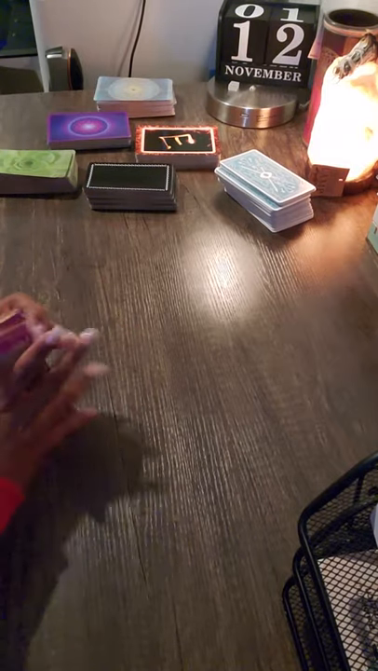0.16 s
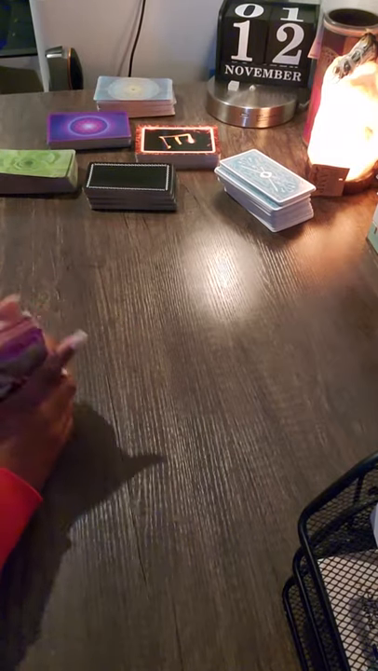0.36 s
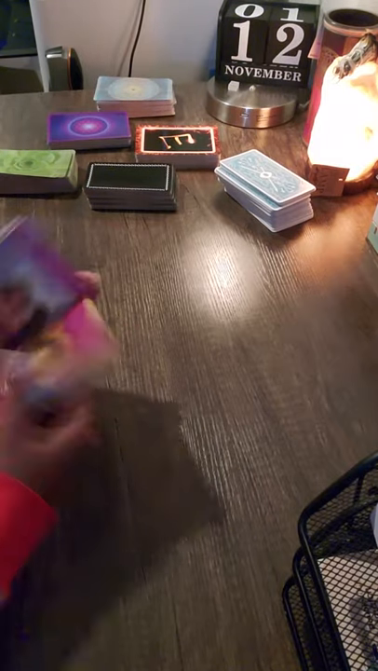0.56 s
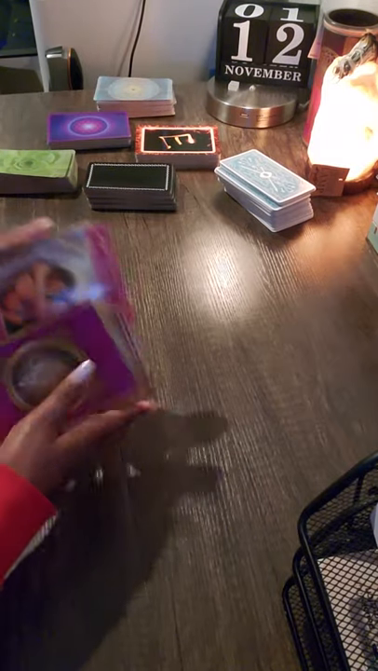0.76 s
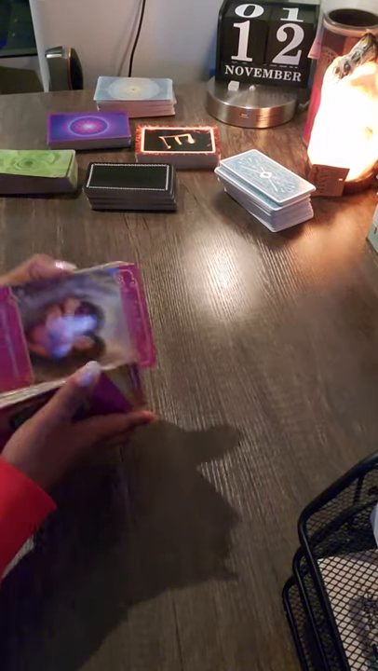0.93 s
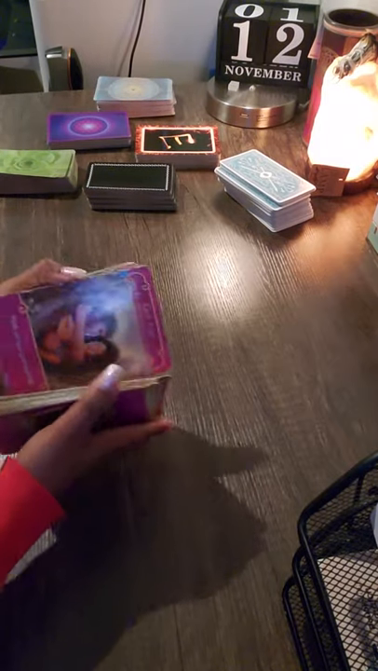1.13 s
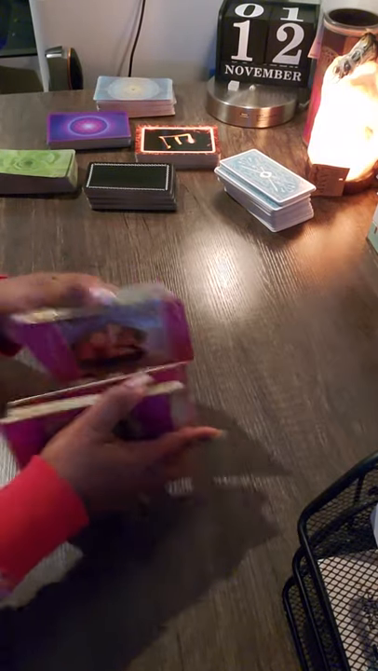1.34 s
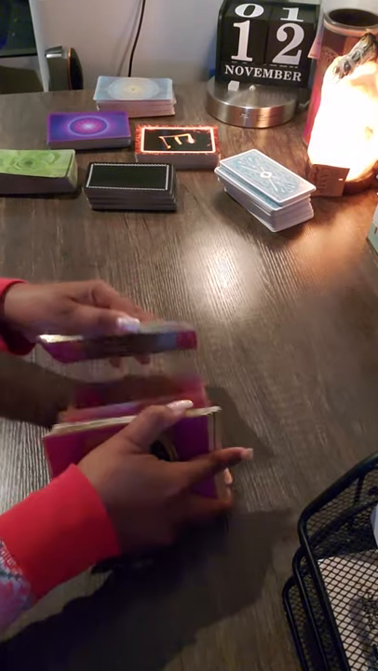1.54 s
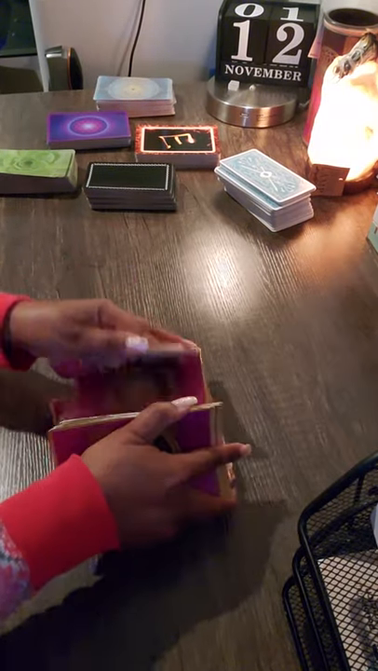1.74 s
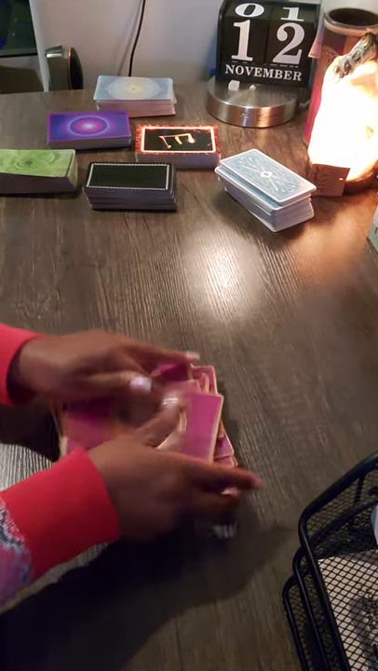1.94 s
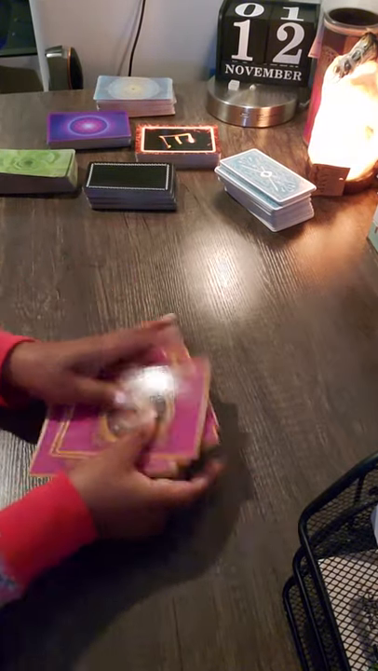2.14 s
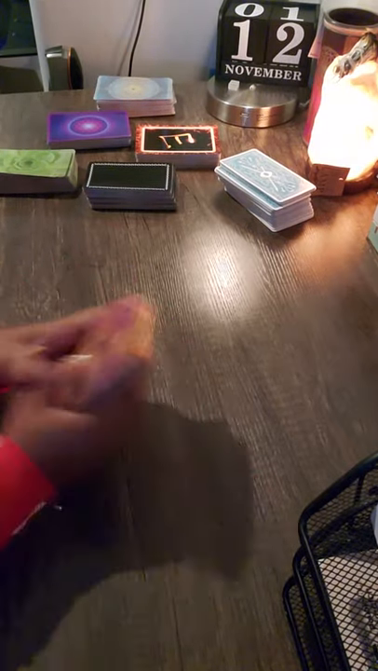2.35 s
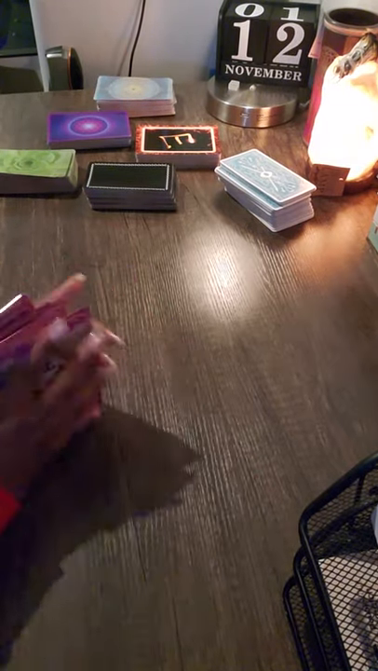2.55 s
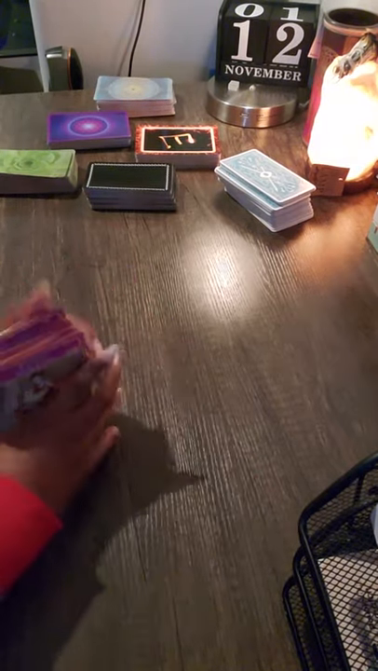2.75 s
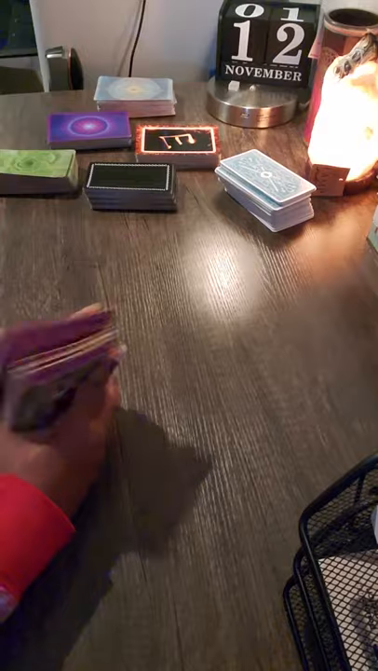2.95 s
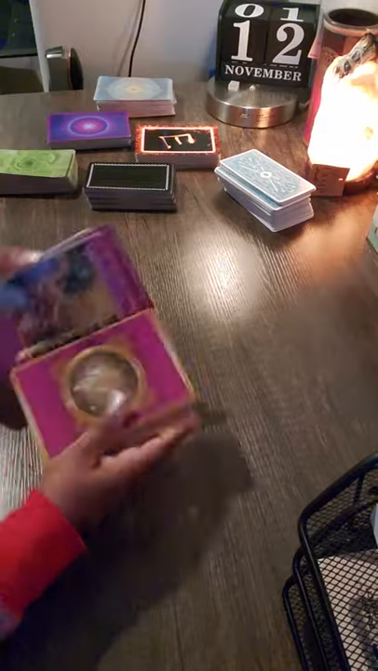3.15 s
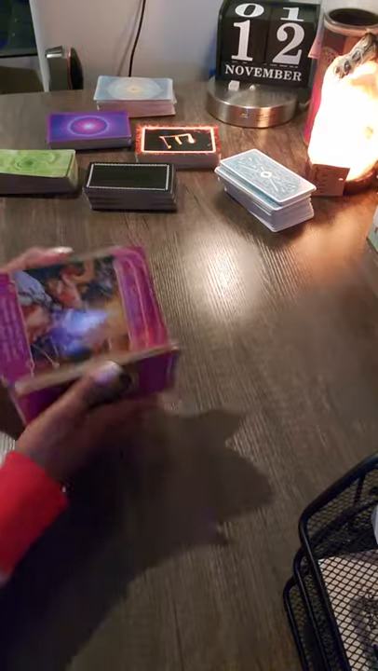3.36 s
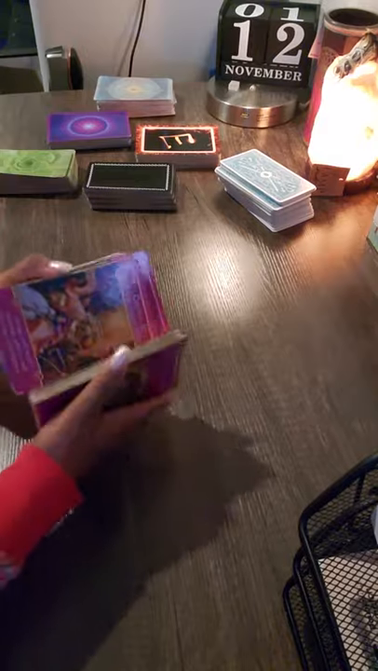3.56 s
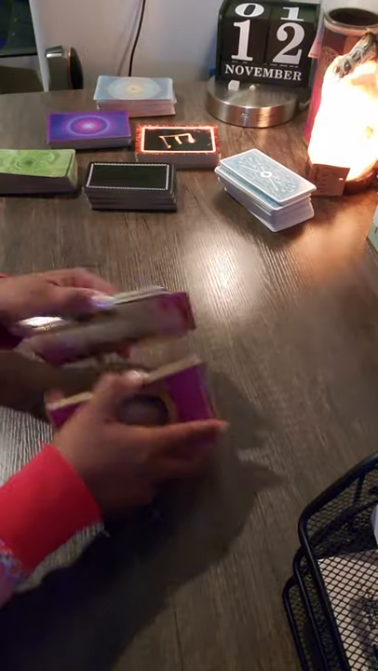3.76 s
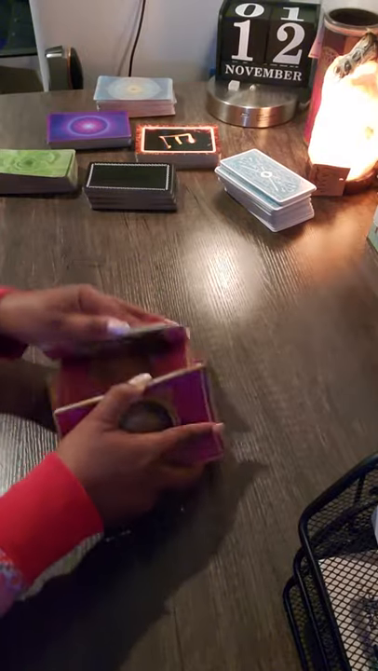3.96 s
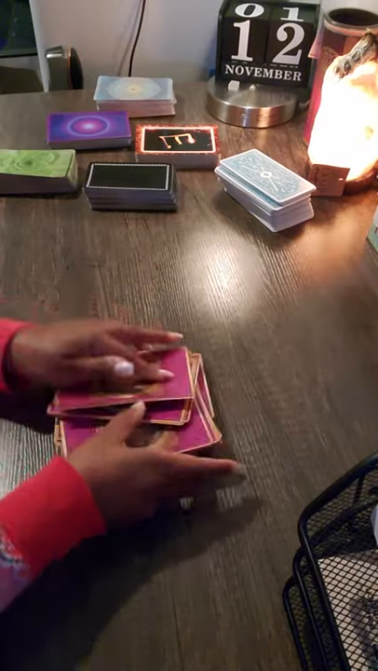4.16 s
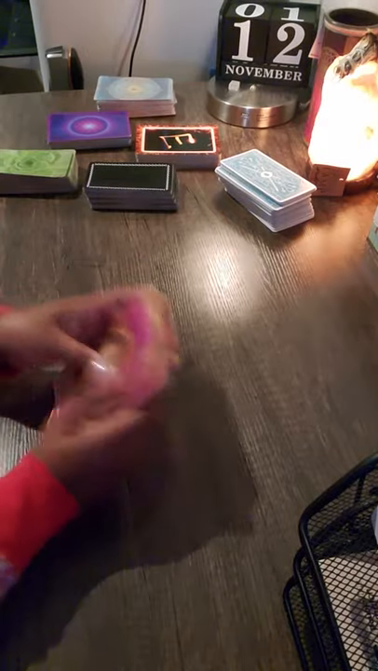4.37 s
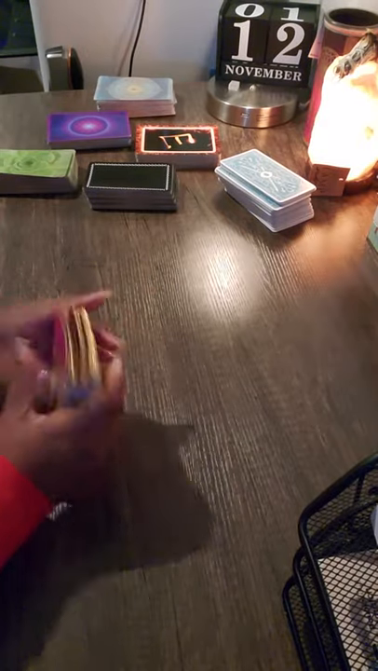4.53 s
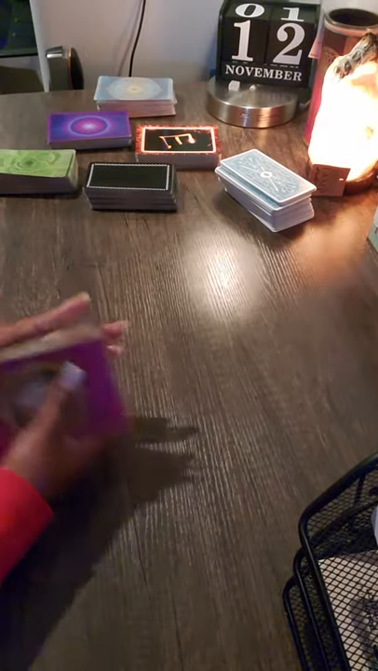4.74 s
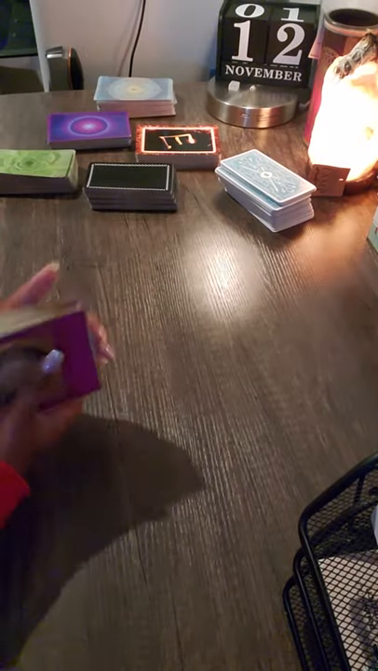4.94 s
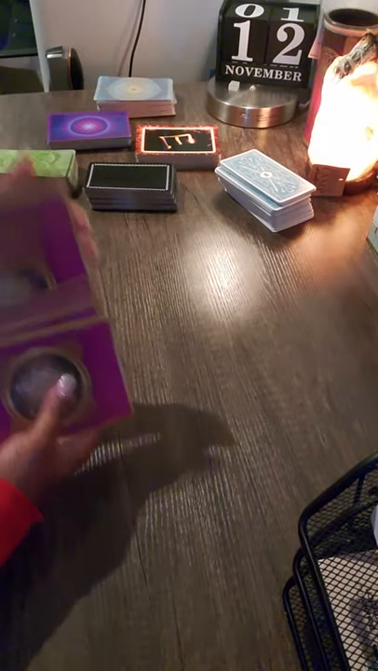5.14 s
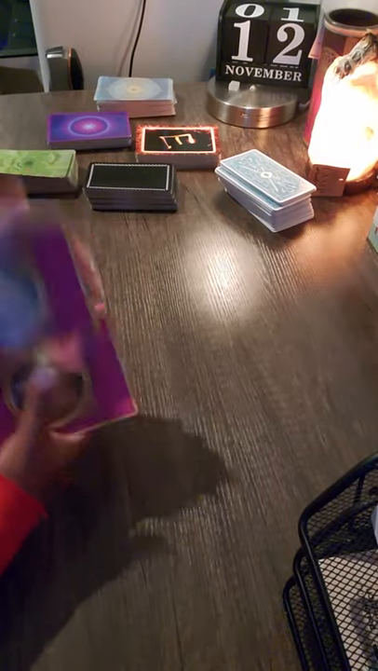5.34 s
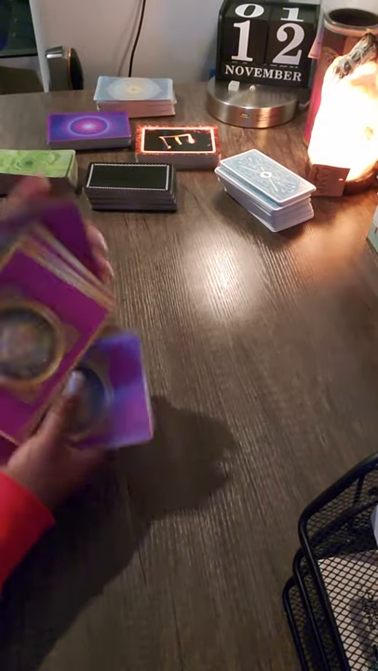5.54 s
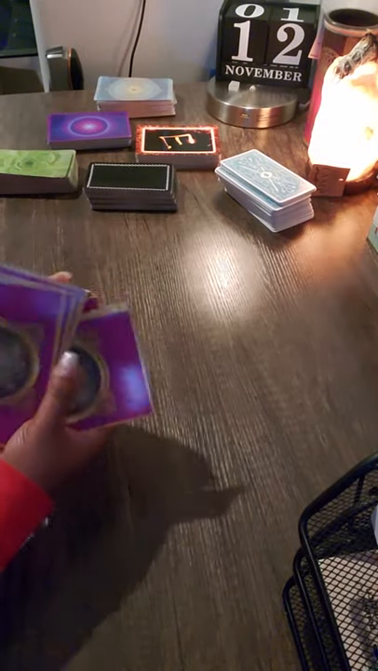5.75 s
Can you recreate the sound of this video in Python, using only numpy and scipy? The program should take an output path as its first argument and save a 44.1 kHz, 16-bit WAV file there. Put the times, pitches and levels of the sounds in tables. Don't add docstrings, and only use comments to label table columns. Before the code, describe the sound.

Close to a phone in a quiet indoor room, two hands shuffle large glossy cards. The deck is knocked square, fingertips tick and brush the edges, then after a near-silent pause packets drop in a rapid clatter of slaps and flicks. Squaring knocks, soft strokes and a second burst follow, then loose drops and the hardest claps at the end.

```python
import sys
import numpy as np
from scipy import signal
from scipy.fft import rfft, irfft, next_fast_len
from scipy.io import wavfile
from scipy.ndimage import uniform_filter1d

SR = 44100
rng = np.random.default_rng(int(sys.argv[2]) if len(sys.argv) > 2 else 0)


def unload_wav(signal):
    wavfile.write(
        sys.argv[1],
        SR,
        np.round(np.clip(np.atleast_2d(signal).T, -1, 1) * 32767).astype(np.int16),
    )


def attenuation_scalar(level_db):
    decades = np.asarray(level_db, float) / 20
    return 10 ** decades


N = 255780
LEAD_S = 0.005
PORT_LAG_MS = 0.094


def evened(x):
    return x / np.sqrt(np.mean(x ** 2) + 1e-20)


def read(points, hz):
    f, value = np.transpose(points)
    return np.interp(np.log(hz + 1), np.log(f + 1), value)


def add(mix, s, sound):
    part = mix[..., round(s * SR):][..., :sound.shape[-1]]
    part += sound[..., :part.shape[-1]]


def band(x, lo_hz, hi_hz):
    return signal.sosfilt(signal.butter(2, [lo_hz, hi_hz], "bandpass", fs=SR, output="sos"), x)


def ring(x, modes, detune=1):
    out = 0
    for hz, width_hz, db in modes:
        b, a = signal.iirpeak(min(hz * detune, SR / 2.2), hz / width_hz / 1.19, SR)
        out = out + attenuation_scalar(db) * signal.lfilter(b, a, signal.lfilter(b, a, x))
    return out


def resonate(x, hz, width_hz):
    turn = np.exp(2j * np.pi * np.cumsum(hz * np.ones(x.shape[-1])) / SR)
    r = np.exp(-np.pi * width_hz / SR)
    smooth = signal.lfilter([(1 - r) ** 2], [1, -2 * r, r ** 2], x / turn + 1e-18)
    return 2 * (turn * smooth).real


def colour(x, points, detune=1):
    hz = abs(np.fft.fftfreq(1024, 1 / SR))
    log_gain = np.log(attenuation_scalar(read(points, hz / detune)))
    minimum_phase = np.exp(log_gain - 1j * signal.hilbert(log_gain).imag)
    taps = np.fft.ifft(minimum_phase).real[:512]
    taps = taps.reshape((1,) * (x.ndim - 1) + (-1,))
    return signal.oaconvolve(x, taps, axes=-1)[..., :x.shape[-1]]


def partly_shared(left, other, same):
    return np.array([left, same * left + np.sqrt(1 - same ** 2) * other])


# [f/Hz, level/dB]
TONE = [(12, -43.5), (20, -1.5), (123, -6), (146, -18.5), (248, -21.5), (1250, -32), (11400, -39),
        (16000, -33)]
# [t/s, level/dB]
RUMBLE = [
    (0.102, -57.5),
    (1.12, -89),
    (2.198, -69),
    (3.25, -60.5),
    (3.751, -90.5),
    (4.399, -57.5),
    (5.098, -73),
]
TONE_DB, HUM_HZ, HUM_DB, RUMBLE_DB, SWELL_S = -71.5, 120, -77, -70, 0.096


def quiet():
    hz, t = np.fft.rfftfreq(N, 1 / SR), np.arange(N) / SR
    left, other = rfft(rng.standard_normal((2, N)))
    tone = irfft(partly_shared(left, other, 1 / (1 + hz / 450)) * attenuation_scalar(read(TONE, hz)), N)
    swells = attenuation_scalar(RUMBLE_DB) + sum(attenuation_scalar(db) * np.exp(-((t - s) / SWELL_S) ** 2 / 2) for s, db in RUMBLE)
    rumble = swells * evened(band(band(rng.standard_normal(N), 55, 76), 34, 120))
    hum = attenuation_scalar(HUM_DB) * evened(band(rng.standard_normal(N), HUM_HZ - 6, HUM_HZ + 6))
    return attenuation_scalar(TONE_DB) * evened(tone) + rumble + hum


# [f/Hz, T60/s]
ROOM_T60 = [(100, 0.27), (600, 0.2), (4800, 0.24), (15000, 0.014)]
# [f/Hz, level/dB]
ROOM_COLOUR = [(4000, -6), (9000, -2)]


def echoes():
    taps = np.zeros((2, SR // 2))
    grid = np.arange(120, SR // 2 - 20, 20)
    at = grid + rng.integers(0, 20, (2, len(grid)))
    np.put_along_axis(taps, at, rng.choice([-1., 1.], at.shape), 1)
    hz, t, z = signal.stft(taps, SR, nperseg=256)
    tail = signal.istft(z * attenuation_scalar(-60 * t / read(ROOM_T60, hz)[:, None]), SR, nperseg=256)[1]
    tail[:, :100] = 0
    hz = np.fft.rfftfreq(tail.shape[1], 1 / SR)
    left, other = rfft(tail / np.linalg.norm(tail[0])) * attenuation_scalar(read(ROOM_COLOUR, hz))
    return irfft(partly_shared(left, other, .85 / (1 + (hz / 600) ** 2)))


ROOM_DB, DRIFT_HZ = -4, 23


def room(x):
    turn = 2 * np.pi * DRIFT_HZ * np.arange(N) / SR
    out = 0
    for k in range(3):
        share = np.sqrt(2 / 3) * np.cos(turn + np.pi * k / 3)
        out = out + signal.fftconvolve((x.mean(0) * share)[None], echoes(), axes=1)[:, :N]
    return attenuation_scalar(ROOM_DB) * out


# [t/s, peak/dB, f/Hz]
PUSHES = [(0.034, -36.5, 92.2), (0.207, -37.5, 131), (0.301, -36, 111), (0.342, -40, 121.8),
          (1.547, -36, 109.2), (1.631, -30, 87.5), (1.695, -34, 160.9), (1.719, -31, 104),
          (1.797, -34.5, 106), (1.919, -32, 172), (1.953, -48, 132), (2.189, -46.5, 92), (2.331, -65, 170),
          (2.399, -59.5, 150), (2.843, -47.5, 93), (1.969, -45.5, 70), (2.482, -49, 115.6),
          (2.557, -32.5, 130), (2.596, -28.5, 136.4), (2.668, -42, 120), (3.888, -26.5, 115),
          (3.989, -28.5, 123), (4.033, -24, 120), (4.062, -42.5, 112), (4.085, -50, 143.4),
          (4.116, -32, 136), (4.141, -36, 145.3), (4.2, -42, 129), (4.589, -34.5, 115), (4.613, -28, 120),
          (5.669, -37, 146), (5.687, -31.5, 139), (5.711, -43, 134)]
PUSH_T60_S, PUSH_RISE_S = 0.087, 0.0067


def pushes():
    out, t = np.zeros(N), np.arange(5000) / SR
    for s, db, hz in PUSHES:
        swell = attenuation_scalar(db + 6.0 - 60 * t / PUSH_T60_S) * np.minimum(t / PUSH_RISE_S, 1)
        add(out, s, -swell * np.sin(2 * np.pi * hz * t))
    return out


# [fastest t/s, rise/s, fall/s, scrape/dB, lightness/dB]
SHOVES = [(.03, 0.22, 0.024, -67, 7.5), (.141, 0.071, 0.36, -67.5, -11), (.3, 0.32, 0.13, -53.5, -16.5),
          (.38, 0.13, 0.016, -61.5, -3), (1.6, 0.083, 0.66, -53.5, -3), (1.8, 0.039, 0.041, -33, -3.5),
          (1.949, 0.1, 0.053, -39.5, 6.5), (2.618, 0.063, 0.18, -51, -17), (2.93, 0.37, 0.025, -64.5, -15),
          (3.929, 0.059, 0.037, -58.5, 14.5), (4.06, 0.13, 0.044, -42.5, -7),
          (4.148, 0.05, 0.053, -32, -1.5), (4.66, 0.1, 0.094, -46.5, -8.5), (5.41, 0.017, 0.14, -46, 3),
          (5.55, 0.24, 0.052, -51, -1), (5.66, 0.025, 0.24, -51, -3)]
# [fastest t/s, rise/s, fall/s, scrape/dB, lightness/dB]
STROKES = [(0.079, 0.083, 0.031, -92, 26), (0.608, 0.047, 0.086, -53.5, 9.5), (0.699, 0.083, 0.043, -60, 1),
           (.86, 0.24, 0.097, -79, 4.5), (2.12, 0.16, 0.06, -56.5, -2), (2.198, 0.082, 0.014, -61.5, 0),
           (2.304, 0.019, 0.11, -47.5, 13.5), (2.44, 0.31, 0.45, -59.5, 1.5), (3.0, 0.03, 0.097, -64.5, 3),
           (3.1, 0.072, 0.25, -66.5, 5), (3.311, 0.039, 0.035, -68, 13.5), (3.409, 0.049, 0.092, -79.5, 9),
           (4.31, 0.34, 0.075, -56.5, -5), (4.419, 0.085, 0.3, -65, 3.5), (4.93, 0.08, 0.15, -79, 4.5),
           (5.15, 0.043, 0.034, -67, -5.5), (5.269, 0.12, 0.057, -73.5, 1.5)]
SLOPE_DB, ROUNDNESS = -20, 1.5
FLEX_DB, FLEX_PER_LIGHT, HISS_DB, HISS_PER_LIGHT = -6.5, -0.82, -0.5, 0.74


def rubbing(t):
    power = np.zeros((3, len(t)))
    for s, rise_s, fall_s, db, light_db in SHOVES + STROKES:
        away = np.maximum((s - t) / rise_s, (t - s) / fall_s)
        flex_db = FLEX_DB + FLEX_PER_LIGHT * light_db
        hiss_db = HISS_DB + HISS_PER_LIGHT * light_db
        mix_db = np.array([[flex_db], [0], [hiss_db]])
        power += attenuation_scalar(db + mix_db + SLOPE_DB * away ** ROUNDNESS) ** 2
    return np.sqrt(power)


# [f/Hz, width/Hz, level/dB]
BODY = [(367, 277, 0), (572, 320, 5), (883, 210, 1.5)]
# [f/Hz, level/dB]
SNAP = [(700, -31), (1200, 0.5), (1900, 5.5), (2500, 2.5), (3300, 6.5), (4300, -2.5), (4900, -17),
        (7200, -40.5)]
# [f/Hz, level/dB]
EDGE = [(2500, -38.5), (4500, -1.5), (7800, 2), (9000, -7), (11000, -7), (13000, -4), (15500, -9.5),
        (17000, -28)]
# [from t/s, f/Hz, level/dB]
HELD = [(.52, 1490, -13.5), (.75, 2620, -26.5), (2.175, 1200, 5), (2.272, 4397, -47), (3.039, 1620, 3),
        (3.148, 2321, -13.5), (4.33, 3610, -5), (4.38, 2464, -44.5), (5.221, 2108, -24.5),
        (5.402, 1823, -0.5), (5.602, 3276, -20)]


def slide():
    t = np.arange(N) / SR
    flexing, scraping, hissing = (np.interp(t, t[::64], gain) for gain in rubbing(t[::64]))
    since, card_hz, card_db = np.transpose(HELD)
    held = np.maximum(np.searchsorted(since, t) - 1, 0)
    grip = evened(uniform_filter1d(uniform_filter1d(rng.standard_normal(N), size=250), size=150))
    flicker_db = 3.6 * np.minimum(rng.exponential(1, N), 6) + 2.2 * grip
    catches = rng.standard_normal((3, N)) * attenuation_scalar(flicker_db)
    pair = catches[0] + 2.5 * catches[1:]
    flex = evened(ring(catches[0] + 1.4 * catches[1:], BODY))
    card = attenuation_scalar(card_db[held]) * evened(resonate(pair, card_hz[held], 780))
    scrape = evened(colour(pair, SNAP)) + card
    return flexing * flex + scraping * scrape + hissing * evened(colour(pair, EDGE))


PATCHY_DB = 2.5


def patchy(x):
    z = signal.stft(x, nperseg=256)[2]
    patches = uniform_filter1d(rng.standard_normal(z.shape[1:]), size=4, axis=0)
    patches = uniform_filter1d(patches, size=12, axis=1)
    return signal.istft(z * attenuation_scalar(PATCHY_DB * evened(patches)), nperseg=256)[1][:, :N]


# [from t/s, length/s, from f/Hz, to f/Hz, level/dB]
HUMS = [(.0, 0.02, 1900, 1890, -59.5), (0.158, 0.11, 633, 556, -46.5), (0.412, 0.085, 420, 325, -58),
        (0.517, 0.077, 624, 487, -63), (0.536, 0.12, 1570, 1330, -55), (.58, 0.062, 1890, 2100, -52.5),
        (.672, 0.037, 615, 620, -58), (0.674, 0.044, 1100, 1350, -53.5), (2.098, 0.032, 3640, 3630, -50),
        (2.457, 0.041, 448, 500, -50), (2.74, 0.15, 633, 415, -64), (3.062, 0.044, 1450, 1610, -60),
        (3.195, 0.023, 1020, 1055, -61), (3.202, 0.028, 2600, 2600, -59), (3.269, 0.037, 2000, 2300, -71),
        (4.309, 0.011, 4370, 4300, -47.5), (4.398, 0.045, 4230, 4280, -52.5),
        (4.407, 0.031, 2900, 3070, -59.5), (4.457, 0.074, 2440, 2480, -63.5),
        (4.61, 0.067, 573, 525, -38.5), (5.118, 0.047, 603, 600, -63), (5.206, 0.021, 6850, 6620, -62.5),
        (5.208, 0.03, 5660, 5000, -59), (5.24, 0.061, 2210, 2550, -64), (5.404, 0.022, 1850, 1790, -22.5),
        (5.422, 0.14, 1870, 1870, -48), (2.349, 0.096, 1010, 930, -58), (2.52, 0.054, 510, 514, -59.5),
        (4.325, 0.053, 3500, 3580, -51), (0.351, 0.034, 7760, 7500, -58),
        (0.052, 0.073, 13500, 13400, -54.5)]
HUM_SHARPNESS = 6


def hums():
    out = np.zeros((2, N))
    for s, length_s, from_hz, to_hz, db in HUMS:
        a, b, c = rng.standard_normal((3, round(length_s * SR)))
        u = np.linspace(0, 1, len(a))
        glide_hz = from_hz + (to_hz - from_hz) * u
        width_hz = from_hz / HUM_SHARPNESS * np.clip(from_hz / 2200, 1, 1.8)
        note = resonate(a + 1.4 * np.array([b, c]), glide_hz, width_hz)
        add(out, s, attenuation_scalar(db) * np.sin(np.pi * u) ** 0.64 * evened(note))
    return out


# [t/s, peak/dB, f/Hz]
FLICKS = [(0.0323, -37.5, 605), (0.1196, -38, 730), (0.1433, -48.5, 800), (0.185, -41, 700),
          (0.1918, -28.5, 1200), (0.2105, -37, 666), (0.2151, -33.5, 1070), (0.2894, -32, 1630),
          (0.3526, -34, 1615), (0.6589, -27.5, 4100), (0.7198, -47, 2950), (1.4913, -54.5, 8250),
          (1.5256, -51, 1980), (1.5793, -34.5, 940), (1.6252, -18, 1764), (1.6632, -30.5, 1100),
          (1.7885, -21, 1850), (1.8074, -20, 6030), (1.8279, -25, 710), (1.8956, -31, 1530),
          (1.9174, -19.5, 1830), (1.9428, -14.5, 2260), (2.1575, -41, 3000), (2.1761, -48, 3190),
          (2.1945, -40.5, 1170), (2.4528, -49, 2040), (2.6415, -41.5, 1830), (2.8596, -23.5, 1214),
          (3.0837, -54, 1520), (3.1711, -48, 4180), (3.2036, -50, 5250), (3.2653, -52, 2260),
          (3.8929, -22.5, 1460), (3.9376, -47, 3040), (3.9854, -34, 1660), (4.0136, -21.5, 1690),
          (4.0369, -30.5, 1980), (4.1016, -23, 1400), (4.1789, -23.5, 1894), (4.2066, -34, 3660),
          (4.2581, -42, 1350), (4.3166, -42.5, 4090), (4.352, -32.5, 4100), (4.3683, -43.5, 2500),
          (4.5841, -25, 640), (4.6363, -35.5, 940), (4.6814, -44, 738), (4.9905, -60, 4660),
          (4.9935, -53, 4640), (5.0942, -54, 7640), (5.3132, -61, 1920), (5.3615, -47, 1960),
          (5.4464, -23, 2000), (5.4788, -29, 1660), (5.4916, -39, 1880), (5.5139, -46, 1930),
          (5.5169, -39, 1940), (5.57, -38, 1620)]
# [t/s, peak/dB, f/Hz]
CRACKS = [(0.0902, -25, 13900), (0.241, -8.5, 3500), (1.379, -62.5, 7000), (1.7015, -12, 4000),
          (2.5556, -15, 4200), (2.662, -22, 2800), (2.8633, -33, 2610), (3.74, -57.5, 7000),
          (4.1428, -14.5, 2190), (5.6907, -15, 3330), (5.7048, -14, 6670), (5.7055, -4.5, 3100)]
FLICK_MS, FLICK_BROAD_DB, FLICK_SHARPNESS = 0.95, -10.5, 2.2


def flicks():
    out, t = np.zeros((2, N)), np.arange(800) / SR - LEAD_S
    for s, db, hz in FLICKS + CRACKS:
        touch = rng.standard_normal(800) * np.exp(-(t * 1000 / FLICK_MS) ** 2)
        touch[round(LEAD_S * SR)] -= 3
        note = resonate(touch, hz, hz / FLICK_SHARPNESS)
        broad = colour(touch, SNAP)
        card = note / abs(note).max() + attenuation_scalar(FLICK_BROAD_DB) * broad / abs(broad).max()
        place = np.clip(rng.standard_normal(), -1.5, 1.5)
        add(out, s - LEAD_S, attenuation_scalar(db) * card * attenuation_scalar(1.2 * place * np.array([[1], [-1]])))
    return out


# [t/s, peak/dB, 20 dB decay/ms, brightest f/Hz]
CLAPS = [(0.2397, -18, 24, 5214), (1.7014, -14, 7, 4950), (2.5565, -13.5, 20, 5400),
         (2.6586, -26, 44, 4530), (2.8634, -24.5, 32, 4130), (4.1293, -21, -1.5, 3500),
         (4.5832, -26, 2, 9000), (4.6129, -20, 0.5, 9000), (5.6898, -18.5, 13.5, 5500),
         (5.7059, -11, 14, 6300), (.1105, -36, 25.5, 3710), (0.1913, -35.5, 29.5, 4156),
         (1.916, -23.5, 3.5, 3000), (4.159, -25, 6.5, 3100)]
CLAP_LOW_HZ, CLAP_TAIL_DB, CLAP_TAIL_MS, CLAP_CRACK = 1100, -13, 75, 9.9


def claps():
    out, ms = np.zeros((2, N)), np.arange(9000) / SR * 1000
    for s, db, dies_ms, top_hz in CLAPS:
        near, grain, left, right = rng.standard_normal((4, 9000))
        clatter = near * attenuation_scalar(3.5 * grain - 20 * ms / max(dies_ms, 1))
        clatter[0] -= CLAP_CRACK
        tail_gain = np.minimum(ms / 6, 1) * attenuation_scalar(CLAP_TAIL_DB - 20 * ms / CLAP_TAIL_MS)
        tail = np.array([left, right]) * tail_gain * min(dies_ms / 15, 1)
        faces = [(CLAP_LOW_HZ / 3, -20), (CLAP_LOW_HZ, -6), (top_hz * .7, 0), (top_hz, -2),
                 (top_hz * 1.4, -28), (16000, -58)]
        add(out[0], s, attenuation_scalar(db) * colour(clatter + tail[0], faces))
        add(out[1], s + PORT_LAG_MS / 2 / 1000, attenuation_scalar(db) * colour(clatter + tail[1], faces))
    return out


# [t/s, snap/dB, edge re snap/dB, f/Hz]
TICKS = [(0.6254, -49, 8, 2020), (0.651, -48, 8, 2600), (0.6554, -53, -18, 3830), (0.6828, -46.5, 5, 3440),
         (0.6923, -40, 0, 4500), (0.719, -49, -4, 3060), (0.971, -63, -5, 1700), (1.04, -70.5, -14.5, 1880),
         (2.0805, -53, 1, 2650), (2.0922, -46, 10, 4700), (2.16, -38.5, 3.5, 3730),
         (2.4134, -38.5, 1.5, 2550), (2.4556, -27, -6.5, 2680), (2.997, -78.5, 8, 1820),
         (3.1027, -43.5, -17, 1640), (3.145, -46.5, -2, 1550), (3.17, -49, -19, 4270),
         (3.2052, -46.5, 3.5, 2800), (3.2642, -52, -8.5, 2350), (3.4457, -42.5, -19.5, 2350),
         (3.6, -65, 4, 2585), (3.8505, -45.5, -3.5, 2110), (4.28, -48, -1, 3860), (4.356, -36, -11.5, 3520),
         (5.028, -61.5, -2.5, 1880), (5.1248, -64, 4.5, 2784), (5.22, -64, 1.5, 5540),
         (5.297, -46.5, -4.5, 1790), (5.311, -61, 0, 1880), (5.4246, -35, 11, 2620)]
# [t/s, snap/dB, edge re
# snap/dB, contact/ms, f/Hz]
KNOCKS = [(0.028, -53, -27, 9.7, 810), (0.088, -59, 20, 0.62, 2360), (0.109, -35.5, -27, 9.5, 1250),
          (0.1221, -34, -38, 1.7, 1570), (0.19, -30.5, -47, 6.5, 1750), (0.228, -28, -51, 12, 1500),
          (0.2389, -17.5, -15, 4.3, 2180), (0.305, -33.5, -38, 20, 2570), (2.5558, -22.5, -35.5, 6, 924),
          (2.563, -20, -36.5, 20.5, 1150), (2.595, -29, -35, 12, 1200), (2.6386, -31.5, -34.5, 15, 2010),
          (2.658, -26, -48, 18, 1440), (1.6965, -16, -33, 0.77, 1500), (2.8585, -34.5, -45, 2.5, 1380),
          (2.863, -23, -49, 5.5, 1630), (4.53, -43.5, -7.5, 7.4, 1580), (4.5817, -29, -11.5, 48, 1100),
          (4.6029, -26, -5, 15.8, 3880), (4.6093, -34, -2.5, 42, 1870), (4.6817, -49, 13, 2.1, 2220),
          (5.672, -16.5, -32, 3.5, 1200), (5.689, -9, -23, 8.2, 2930), (5.704, -10, -2, 1.8, 1510)]
# [t/s, snap/dB, body re snap/dB, edge re snap/dB, f/Hz]
DROPS = [(1.513, -48.5, -5, 0.5, 2744), (1.553, -22, -2, 0.8, 1600), (1.626, -25, -2, -13, 1830),
         (1.6262, -22.5, -1, 1.5, 1723), (1.6444, -38.5, -5, 7, 1938), (1.665, -35, -12.5, -7, 3283),
         (1.7007, -12, -1.5, -3.5, 1755), (1.7162, -20, -15.5, -11.5, 1890), (1.731, -30.5, -6, 5, 3043),
         (1.7788, -21.5, -4.5, -4.5, 4190), (1.792, -20.5, -16.5, -10.5, 1610),
         (1.8094, -26, -3.5, 1, 2680), (1.8218, -31.5, 4.5, 1.5, 1206), (1.868, -28.5, -0.5, 8.5, 2520),
         (1.8824, -21.5, -1.5, -8, 1970), (1.902, -22.5, -5.5, -1.5, 1890),
         (1.9191, -28.5, -4.5, -26.5, 1935), (1.9261, -18.5, -3, -16.5, 1943),
         (1.9324, -20.5, 3.5, -11, 1466), (1.9438, -19, 3.5, -5, 1907), (1.951, -21.5, -4.5, -16, 1740),
         (1.982, -47, -5, -4, 3200), (2.0175, -48.5, 8.5, 11.5, 2010),
         (3.8855, -21.5, -4, -2.5, 3080), (3.9827, -56, 19.5, -11, 1740),
               (3.9944, -28, -9, -2.5, 1730), (4.0122, -37, 0, -27, 1820), (4.0284, -27, -1, -3, 1850),
               (4.048, -26.5, 3.5, -12, 1330), (4.092, -26.5, -4.5, -6, 1770),
               (4.1166, -15.5, -3.5, -7.5, 3130), (4.14, -12.5, -7, -4.5, 3000),
               (4.1573, -24.5, -8, -42, 2000), (4.1763, -23.5, -5, -3, 1930), (4.2032, -35, -8, 7, 3820),
               (4.2219, -40, 3.5, 5.5, 3260), (5.363, -47.5, 4, 3, 2000), (5.3701, -28.5, -3.5, -10, 2160),
               (5.379, -34.5, 0.5, -0.5, 2020), (5.3946, -32, 5, -28, 1580),
               (5.4097, -14.5, -1, -8.5, 1750), (5.4443, -30, -30, -15, 2070),
               (5.4612, -27.5, -28, -8, 1830), (5.538, -35.5, -11, -12, 3550),
               (5.5696, -43.5, -5, -1, 1580), (5.6263, -39, -1.5, -10, 1930), (5.6359, -42, 0, -4, 3570)]
THICK_HZ, THICK_DB, THIN_DB_PER_OCTAVE = 1200, 1, -13
DROP_MS, HARD_SHORTENS = 4.77, 0.071
TICK_MS, TICK_BODY_DB = 4.85, -17


def contacts():
    packets = []
    for s, db, edge_db, ms, hz in KNOCKS:
        body_db = THICK_DB + THIN_DB_PER_OCTAVE * np.log2(hz / THICK_HZ)
        packets.append((s, db, body_db, edge_db, ms, hz))
    for s, db, body_db, edge_db, hz in DROPS:
        ms = DROP_MS * attenuation_scalar(-HARD_SHORTENS * (db + 25))
        packets.append((s, db, body_db, edge_db, ms, hz))
    return packets, [(s, db, TICK_BODY_DB, edge_db, TICK_MS, hz) for s, db, edge_db, hz in TICKS]


AIRY_PER_EDGE_DB = -0.18


def slap(snap_db, body_db, edge_db, ms, card_hz):
    t = np.arange(4000) / SR - LEAD_S
    span = ms / 1000
    touch = np.clip(t / (0.0016 + 0.069 * span), 0, 1) * attenuation_scalar(-9.5 * t / span)
    touch += attenuation_scalar(-20 - 7300 * abs(t))
    grains, unevenness = rng.standard_normal((2, 4000))
    clump = touch * grains * attenuation_scalar(6.56 * unevenness)
    clump[round((LEAD_S + .0011) * SR)] -= 6.5
    detune = 1 + 0.051 * np.clip(rng.standard_normal(2), -2, 2)
    body = ring(band(clump, 150, 2200), BODY, detune[0])
    snap = colour(clump, SNAP, detune[1])
    low_snap = band(band(band(clump, 480, 6000), 230, 5400), 100, 8200)
    snap = snap + attenuation_scalar(4.5) * resonate(snap, card_hz, 900) + attenuation_scalar(-6.5) * low_snap
    airy = [(hz, db + AIRY_PER_EDGE_DB * edge_db * (hz > 10000)) for hz, db in EDGE]
    edge = colour(clump * attenuation_scalar(-3.5 * abs(t) / span), airy)
    card = 0
    for db, part in ((body_db, body), (0, snap), (edge_db, edge)):
        peak = np.sqrt(uniform_filter1d(2 * part ** 2, size=70).max())
        card = card + attenuation_scalar(db) * part / peak
    return attenuation_scalar(snap_db) * card


def slaps(rows):
    out = np.zeros((2, N))
    for s, *setting in rows:
        sound = slap(*setting)
        side, lag = np.clip(rng.standard_normal(2), -1.5, 1.5)
        add(out[0], s - LEAD_S, sound * attenuation_scalar(1.2 * side))
        add(out[1], s - LEAD_S + 9e-5 * lag, sound * attenuation_scalar(-1.2 * side))
    return out


TICK_ROOM_DB = -2.5


def scene():
    packets, ticks = (slaps(rows) for rows in contacts())
    cards = packets + patchy(slide()) + hums() + pushes()
    ticks = ticks + flicks()
    size = next_fast_len(N)
    lag_s = np.array([[0], [PORT_LAG_MS / 1000]])
    lag = np.exp(-2j * np.pi * np.fft.rfftfreq(size, 1 / SR) * lag_s)
    direct = irfft(rfft(cards + ticks, size) * lag, size)[:, :N]
    return direct + room(cards + attenuation_scalar(TICK_ROOM_DB) * ticks) + quiet() + claps()


def top_cut(x):
    return signal.sosfilt(signal.butter(12, 17000, fs=SR, output="sos"), x)


def record(dry):
    thin = signal.sosfilt(signal.butter(1, 45, "highpass", fs=SR, output="sos"), dry)
    rounded = np.tanh(thin / 0.77) * 0.8
    band_limit = signal.firwin(255, 16200, window=("kaiser", 7), fs=SR)
    return top_cut(signal.oaconvolve(rounded, band_limit[None], "same"))


dry = scene()
out = record(dry)
unload_wav(out)
```